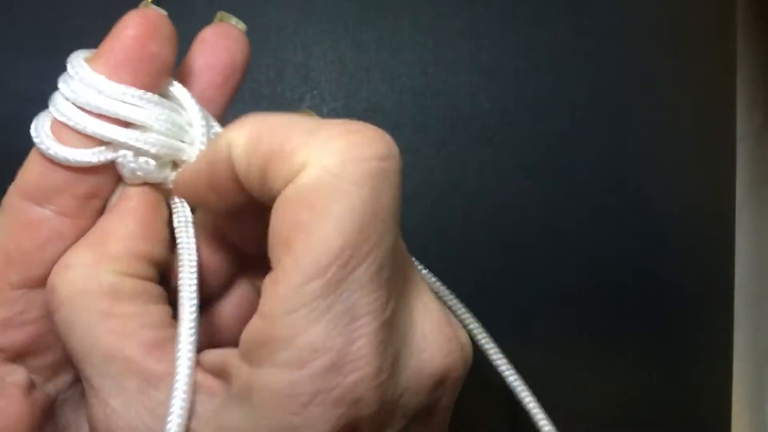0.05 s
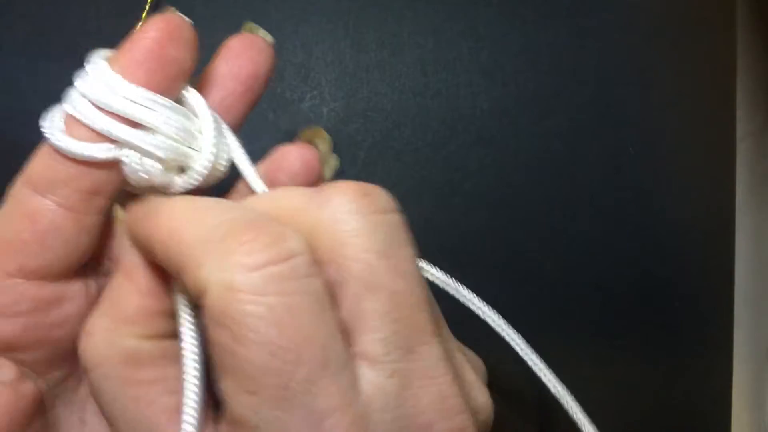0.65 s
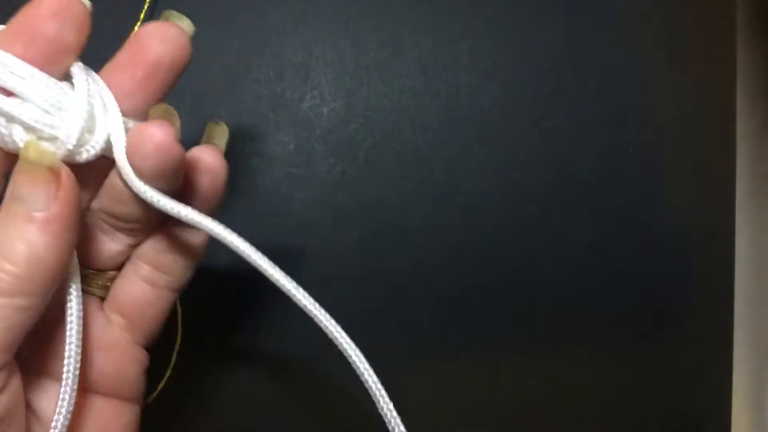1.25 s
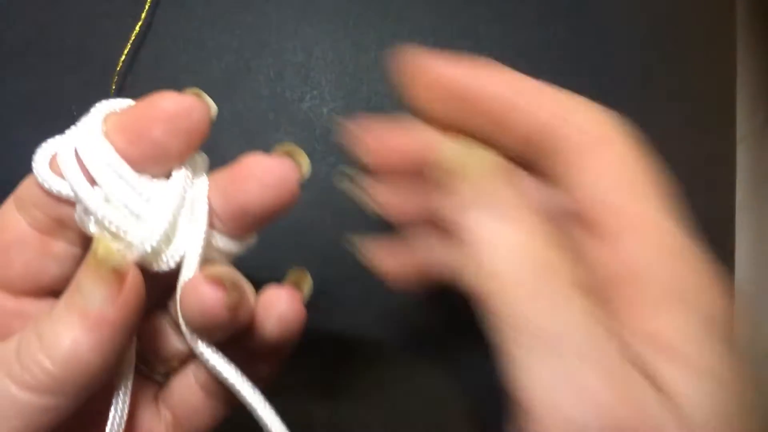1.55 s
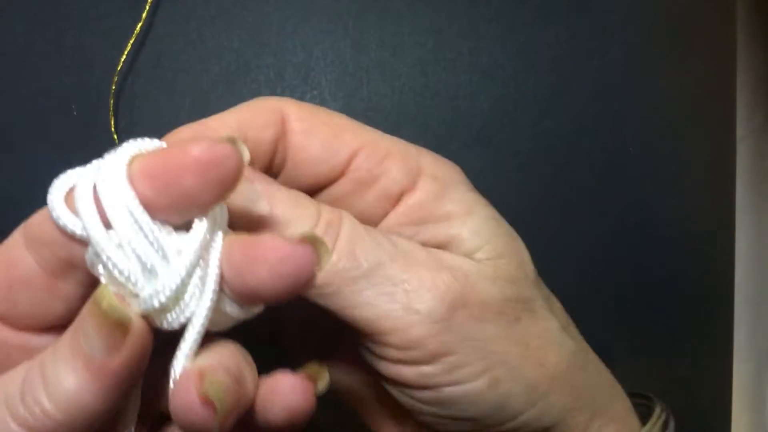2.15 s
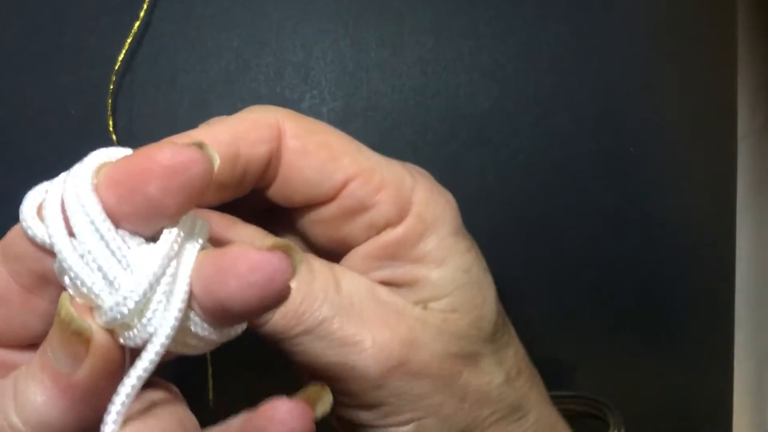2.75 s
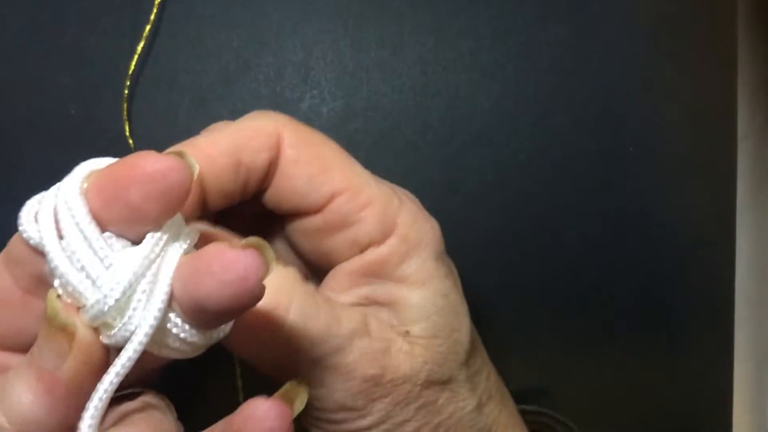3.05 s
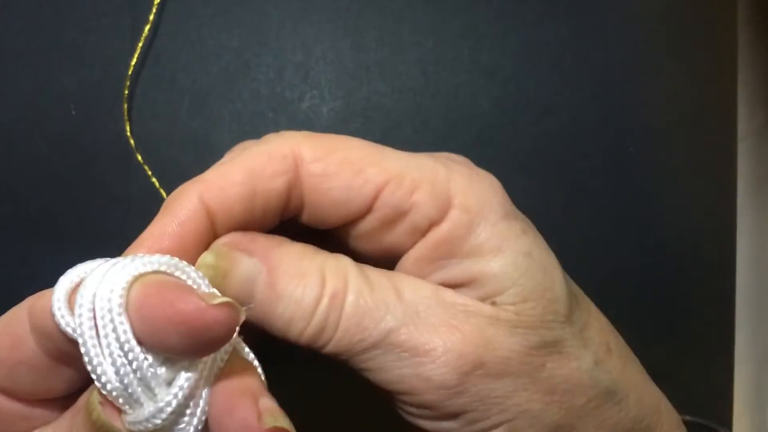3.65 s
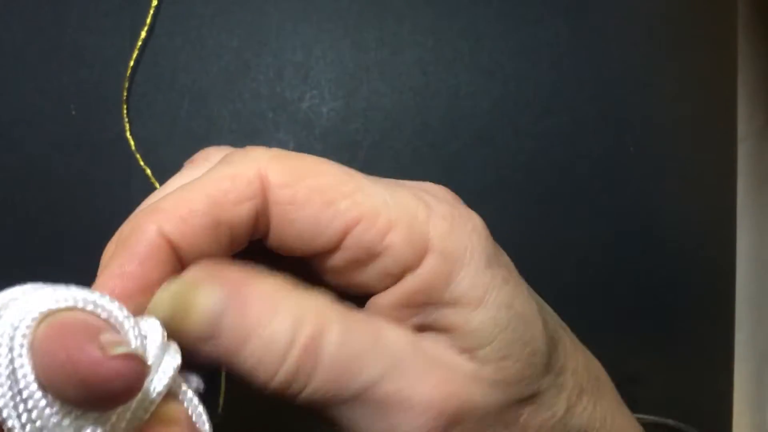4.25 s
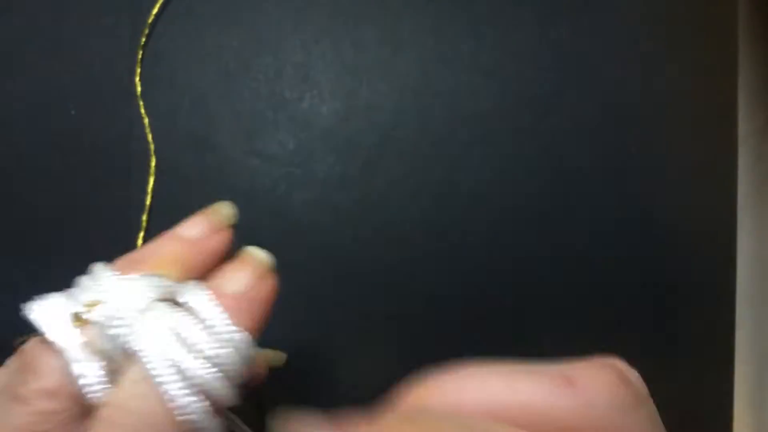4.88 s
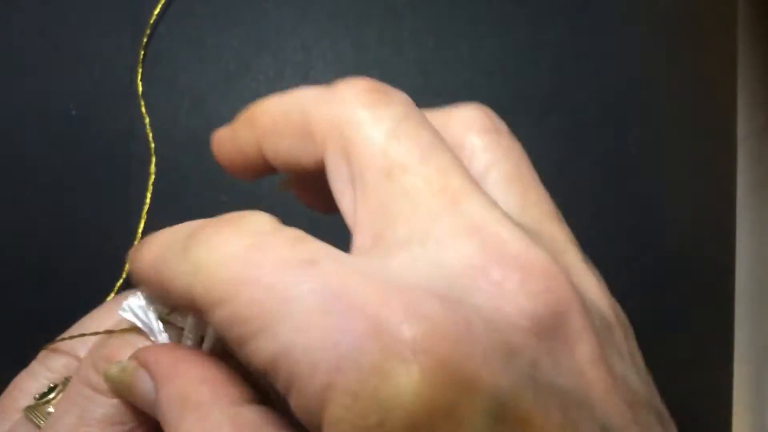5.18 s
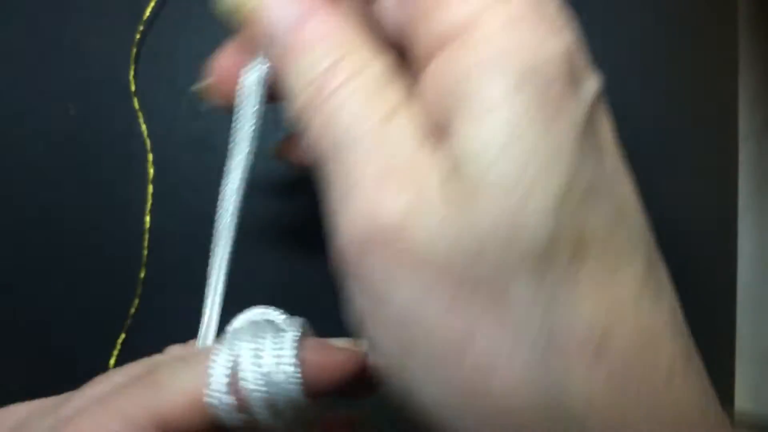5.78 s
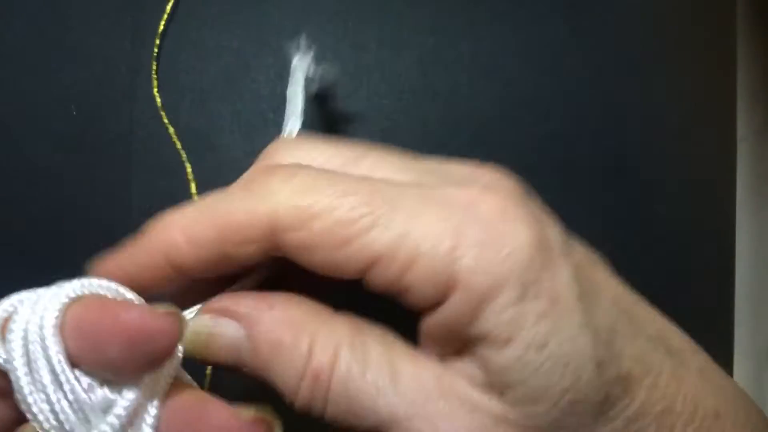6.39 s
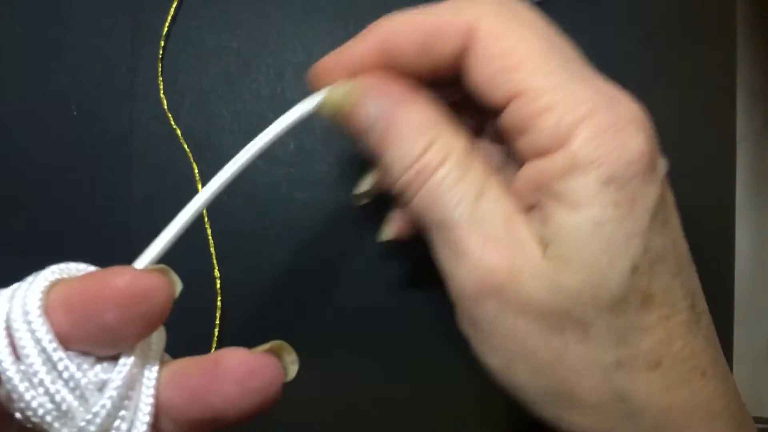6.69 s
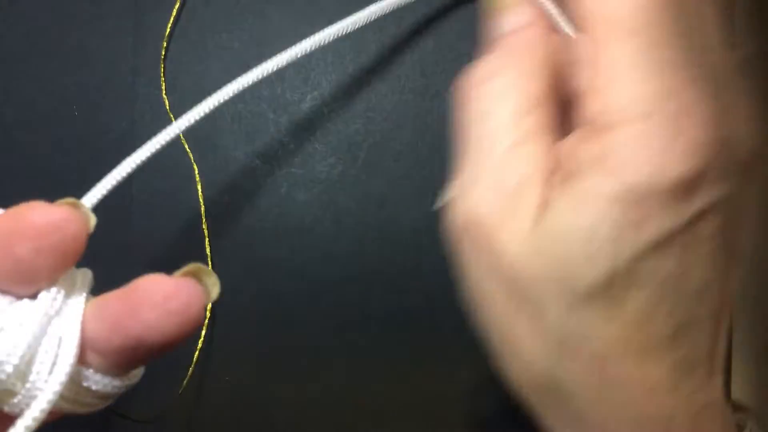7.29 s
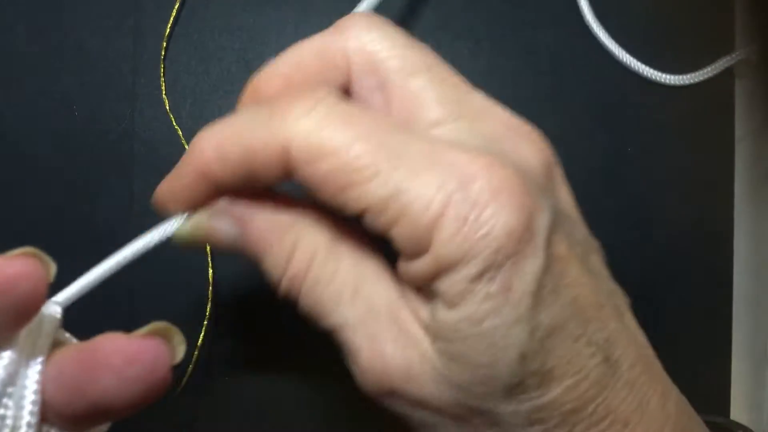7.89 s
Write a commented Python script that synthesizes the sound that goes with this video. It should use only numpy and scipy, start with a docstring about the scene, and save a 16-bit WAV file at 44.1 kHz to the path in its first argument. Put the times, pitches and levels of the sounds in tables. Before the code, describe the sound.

Close up, over the steady hush of a room, a braided cord slides across skin with soft, irregular rubbing. Small sharp fingernail clicks and light jingles of thin bangles come early, with a faint swish of cloth. In the middle the cord tightens and slips amid more clicks and dull bumps of knuckles on a desk. The last pulls are the strongest, rasping and zipping briefly between further low knocks.

```python
"""At a desk in a quiet room, braided cord is pulled and wound round the fingers, heard from close by.
Stick-slip friction makes the braid rasp over cord and skin, creak as it tightens and now and then slip.
Impacts excite damped resonances: fingernails tick, thin bangles jingle, knuckles bump the desk.
Cloth swishes as the arm swings, and the hands rumble along the desk over the steady hush of the room."""
import sys
import numpy as np
from scipy import signal
from scipy.fft import rfft, irfft, next_fast_len
from scipy.io import wavfile
from scipy.ndimage import map_coordinates

SR = 44100
rng = np.random.default_rng(int(sys.argv[2]) if len(sys.argv) > 2 else 0)


def unload_audio(sound):
    """Save the sound as a 16-bit wav file, at the path given as the first command line argument."""
    columns = np.transpose(np.atleast_2d(sound))
    # keep every value between -1 and 1, then stretch to whole-number steps
    steps = np.round(np.clip(columns, -1, 1) * 32767)
    wavfile.write(sys.argv[1], SR, steps.astype(np.int16))


N = 358533
TIME = np.arange(N) / SR


def undb(db):
    """Amplitude ratio of a level in decibels."""
    return 10 ** (np.asarray(db) / 20)


def unit(x):
    """Normalisation to rms 1."""
    return x / np.sqrt(np.mean(x ** 2) + 1e-20)


def add(out, start, x):
    """Superposition: x joins out at a start time in seconds."""
    i = max(int(start * SR), 0)
    out[i:i + len(x)] += x[:max(N - i, 0)]


def colour(x, points):
    """Spectral shaping by points (f/Hz, gain/dB), joined on a logarithmic frequency axis."""
    hz, db = np.transpose(points)
    size = next_fast_len(len(x) + 2048)
    f = np.maximum(np.fft.rfftfreq(size, 1 / SR), 1)
    gain = undb(np.interp(np.log(f), np.log(hz), db))
    return irfft(rfft(x, size) * gain, size)[:len(x)]


def resonate(x, hz, q, stages=1):
    """Resonance: second-order stages in series, each with gain 1 at its centre and at most SR/4 wide."""
    for _ in range(stages):
        x = signal.lfilter(*signal.iirpeak(hz, max(q, 4 * hz / SR), fs=SR), x)
    return x


def fade(t, t60):
    """Exponential damping: 60 dB down after t60 seconds."""
    return np.exp(-np.log(1000) * t / t60)


def ring(modes, scatter_db, detune, size=13000):
    """Modal impulse response: the place of contact weights the modes, the grip shifts them slightly."""
    t = np.arange(size) / SR
    chance = rng.standard_normal((len(modes), 2))
    return sum(undb(db + scatter_db * a) * np.sin(2 * np.pi * hz * (1 + detune * b) * t) * fade(t, t60)
               for (hz, db, t60), (a, b) in zip(modes, chance))


def wander(rate, size):
    """Random modulation: Gaussian values, rate per second, joined by straight lines."""
    steps = rng.standard_normal(4096)
    return np.interp(np.arange(size) / SR * rate, np.arange(len(steps)), steps)


def stroke(start, length, attack, release):
    """Trapezoidal speed of one move of the hand; attack and release are shares of its length."""
    along = (TIME - start) / length
    return np.clip(np.minimum(along / attack, (1 - along) / release), 0, 1)


def friction(size, rate, spread_db, catch_db, hiss):
    """Stick-slip friction: uneven snaps, rate per second, over a hiss, bunched as the strands catch."""
    impulses = (rng.random(size) < rate / SR) * rng.choice([-1, 1], size)
    snaps = impulses * undb(spread_db * np.minimum(rng.exponential(size=size), 4))
    grains = unit(snaps) + hiss * rng.standard_normal(size)
    return unit(grains * undb(catch_db * wander(130, size)))


def hush(level_db=-62):
    """Ambient noise: steady and strongest in the bass."""
    # spectrum of the room's noise: f/Hz, gain/dB
    spectrum = [(22, -56), (38, 2), (55, 7), (100, -4), (250, -2.5), (430, -12), (700, -15), (1200, -16.5),
                (2600, -20.5), (3800, -22), (5000, -25.5), (10000, -24.5), (14500, -27), (16000, -33.5)]
    return undb(level_db) * unit(colour(rng.standard_normal(N), spectrum))


def room(x, size=14000):
    """Reverberation: faint, dull, diffuse reflections follow the direct sound."""
    t = np.arange(size) / SR
    diffuse = colour(rng.standard_normal(size), [(100, 1.5), (3000, -1), (15000, -9)])
    tail = diffuse * fade(t, t60=.11) * (t > .004)
    return x + undb(-17.5) * signal.fftconvolve(x, tail / np.linalg.norm(tail))[:N]


def swishes():
    """Friction noise: cloth brushes in one broad band, its amplitude following the speed of the arm."""
    # swings of the arm: t/s, duration/s, level/dB, centre f/Hz
    swings = [(.8, 0.45, -73, 1590), (1.14, 0.19, -64, 2050), (1.47, 0.36, -68, 2300),
              (6.085, 0.15, -63.5, 3200), (6.258, 0.27, -70.5, 3470), (6.47, 0.18, -74, 5600)]
    out = np.zeros(N)
    for start, length, db, hz in swings:
        cloth = resonate(rng.standard_normal(N), hz, q=1.8, stages=2)
        out += undb(db) * unit(cloth) * stroke(start, length, attack=.27, release=.38)
    return out


def bumps():
    """Impact excitation: knuckles knock the desk, and a softer contact rings only its low modes."""
    # knocks: t/s, peak level/dB, cut-off f/Hz set by the softness of the contact
    knocks = [(1.276, -42, 605), (1.428, -42, 342.7), (1.759, -44.5, 354), (1.966, -42, 252),
              (2.997, -36.5, 265), (3.119, -31.5, 636), (3.145, -38, 405), (3.513, -39.5, 298),
              (4.793, -24.5, 820), (4.986, -36, 252), (5.035, -38, 122), (5.69, -48, 111),
              (7.157, -38.5, 244), (7.221, -30.5, 199), (7.268, -26.5, 201), (7.632, -26.5, 227),
              (8.047, -38, 197)]
    # modes of the desk: f/Hz, relative level/dB, T60/s
    desk_modes = [(59.7, -24, .14), (96.6, -9, 0.48), (117, 0.5, 0.17), (151, -11, 0.11),
                  (191.5, -3, 0.084), (234.6, 0, 0.074), (269, 1.5, 0.091), (311, 3, 0.077),
                  (373, -6, 0.18), (570, 2.5, 0.049), (700, -6, 0.058), (846, 2.5, 0.056),
                  (966, -1.5, 0.068), (1400, 2, 0.023)]
    out = np.zeros(N)
    for start, db, hz in knocks:
        blow = ring(desk_modes, scatter_db=1.2, detune=.01)
        knock = signal.sosfilt(signal.butter(2, [80, hz], "bandpass", fs=SR, output="sos"), blow)
        add(out, start, undb(db) * knock / np.abs(knock).max())
    return out


def bangles(size=13000):
    """Forced vibration: runs of tiny contacts scrape thin metal hoops and drive their modes."""
    # bangles sliding on each other: t/s, duration/s, level/dB, scrape re ring/dB
    jingles = [(0.473, 0.03, -50.5, 2), (1.041, 0.027, -52.5, -6), (1.306, 0.017, -44.5, 4),
               (1.332, 0.018, -55.5, 3), (1.429, 0.018, -50, 0), (1.449, 0.035, -46.5, -5),
               (1.539, 0.013, -59.5, -9), (1.663, 0.0078, -53.5, -1), (1.681, 0.027, -47, -8),
               (1.714, .008, -66, -3), (1.823, 0.0071, -58, 4), (2.067, 0.034, -66, 3),
               (2.684, 0.1, -62, 1), (3.302, .006, -68, 9), (3.4, 0.0236, -54, -1),
               (3.483, 0.048, -55.5, -14), (3.517, 0.028, -56, -20), (3.554, 0.0076, -52.5, 10),
               (3.602, 0.0066, -57.5, 5), (3.629, 0.0085, -58.5, 3), (4.777, 0.039, -50.5, -6),
               (4.865, 0.01, -53.5, 0), (6.919, 0.021, -52, -3)]
    # modes of the hoops: f/Hz, relative level/dB, T60/s
    hoop_modes = [(2410, -16.5, 0.097), (4560, -17.5, 0.076), (5440, -13, 0.1), (7640, -14, 0.11),
                  (8570, 3, 0.088), (9030, -13, 0.094), (9800, -7, .04), (11240, -4, 0.12),
                  (11200, -10, .05), (12650, 1.5, 0.11), (12530, 1, 0.053), (13310, -7, .04),
                  (13900, -9, .04), (14700, -2.5, 0.067), (15500, -6, .04)]
    # spectrum of the scrape: f/Hz, gain/dB
    scrape_spectrum = [(2000, -13.5), (5000, -7), (8500, -1.5), (12500, 6.5), (16000, .5)]
    out, t = np.zeros(N), np.arange(size) / SR
    for start, length, db, scrape_db in jingles:
        touch = np.minimum(t / .0021, 1) * fade(np.maximum(t - length, 0), t60=.0095)
        chatter = touch * friction(size, rate=1800, spread_db=2.5, catch_db=2.5, hiss=.33)
        hoops = ring(hoop_modes, scatter_db=3, detune=.0015)
        metal = signal.fftconvolve(chatter, hoops)[:size]
        scrape = colour(chatter, scrape_spectrum)
        jingle = unit(unit(metal) + undb(scrape_db) * unit(scrape))
        sounding_share = (length + .015) * SR / size
        add(out, start, undb(db) * jingle * np.sqrt(sounding_share))
    return out


def ticks(size=3000):
    """Transient excitation: a nail snaps off an edge and rings briefly, with a duller finger knock."""
    # nail ticks: t/s, peak level/dB, centre f/Hz, relative knock level/dB, nominal Q
    contacts = [(.126, -42.5, 7260, -33, 1.7), (0.2721, -27, 8750, -19, .45), (1.276, -38, 2000, -13, 0.29),
                (3.01, -42, 4300, -4, 1.1), (3.0455, -41.5, 4260, -16, 1.1), (3.069, -41, 4220, -27, 2.3),
                (3.0895, -41.5, 5200, -14.5, .79), (3.1092, -32, 5640, -20.5, 0.91),
                (3.1177, -25.5, 8730, -16, 2.3), (4.6121, -28.5, 3130, -21, .65),
                (4.693, -28.5, 8850, -17.5, .66), (5.4194, -41.5, 8300, -25, 1.3),
                (5.5096, -22, 7150, -35, 1.44), (5.832, -35.5, 7900, -42, 1.9),
                (5.845, -39.5, 7940, -35, 1.7), (5.8527, -42, 9300, -38.5, 1.1),
                (6.0205, -24.5, 8200, -24, 0.99), (6.0444, -42.5, 7020, -12, 1.1),
                (6.4794, -42.5, 5680, -30, 0.79), (7.1561, -34.5, 3570, 8, 1.7),
                (7.6302, -31, 1530, -9, 1.2)]
    # spectrum of the nail's edge: f/Hz, gain/dB
    edge_spectrum = [(400, 11), (1800, 3), (2800, 2.5), (4000, 2), (5000, -5), (6200, 4), (7500, -0.5),
                     (9000, 3.5), (10800, 0), (13000, 7), (16000, 6.5)]
    out, t = np.zeros(N), np.arange(size) / SR
    envelope = np.minimum(t / .002, 1) ** 2 * fade(t, t60=.015)
    for start, db, hz, knock_db, q in contacts:
        snap = colour(rng.standard_normal(size) * envelope, edge_spectrum)
        nail = unit(resonate(snap, hz, q, stages=2))
        finger = unit(resonate(snap, hz=2330, q=.34, stages=2))
        tick = nail + undb(knock_db + 7.5) * finger + undb(-16.5) * unit(snap)
        peak = np.sort(np.abs(tick))[-4:].mean()
        add(out, start, undb(db) * tick / peak)
    return out


def creaks():
    """Slow stick-slip: tight turns of the coil creep over each other in small uneven jerks."""
    # tightenings: start t/s, end t/s, nominal jerk rate/Hz, relative level/dB
    tightenings = [(2.619, 3.004, 76, -71), (3.8, 4.3, 31.6, -72.5), (6.4, 6.731, 35, -71)]
    # spectrum of the coil: f/Hz, gain/dB
    coil_spectrum = [(500, -7), (2500, -2), (5800, -.5), (9000, -2.5), (15000, -19)]
    out, t = np.zeros(N), np.arange(400) / SR
    for start, end, rate, db in tightenings:
        run = np.zeros(N)
        gaps, strengths = rng.standard_normal((64, 2)).T
        times = start + np.cumsum(np.exp(.5 * gaps)) / rate
        jerks = rng.standard_normal((64, len(t))) * fade(t, t60=.0093)
        for onset, strength, jerk in zip(times[times < end], strengths, jerks):
            add(run, onset, undb(2.4 * strength) * jerk)
        sounding_share = (end - start) * SR / N
        out += undb(db) * unit(colour(run, coil_spectrum)) * np.sqrt(sounding_share)
    return out


def slips():
    """Static friction gives way: the cord rasps abruptly and zips as its weave runs over a nail."""
    # slips: t/s, duration/s, relative level/dB, place of the peak (0-1), tilt/(dB per octave),
    # zip re rasp/dB, zip f/Hz
    releases = [(.337, 0.018, -49, 0.5, 1.5, -26, 3900), (0.353, 0.049, -52, 0.3, 4, -28, 3850),
                (0.65, 0.026, -55, 0.5, 5.5, -27, 3850), (0.908, 0.023, -52.5, .5, 6.5, -9, 7000),
                (1.063, 0.02, -47, .7, 12, -5, 7360), (2.713, 0.047, -52.5, 0.35, 6, -6, 5450),
                (3.135, 0.033, -37, 0.35, 4, -10, 660), (3.395, 0.093, -55.5, 0.26, 2.5, -8, 5760),
                (3.477, 0.054, -55.5, 0.67, -1.5, -10, 3760), (4.296, 0.036, -57, .4, 10, -6, 5800),
                (4.53, 0.059, -57, 0.36, 4, -3, 10800), (4.596, 0.028, -49, 0.85, -1.5, 4, 3400),
                (4.641, 0.07, -54.5, 1, 1, -4, 3560), (4.702, 0.16, -49, 0.5, 2, -5, 3340),
                (5.523, 0.081, -55, 0.18, 1, -6.5, 2010), (6.737, 0.18, -53.5, 0.03, 0.5, -6, 3470),
                (6.846, 0.012, -40.5, 0.1, 4, 2, 3740), (6.855, 0.037, -36, 0.18, 4.5, 2, 3920),
                (7.178, 0.076, -45.5, 0.8, -1.5, -14, 3760), (7.236, 0.022, -37, 0.8, -4, -8, 3780),
                (7.238, .04, -33.5, 0.73, -0.5, -7.5, 1210), (7.284, 0.019, -48.5, 0.3, 10, -5, 3500),
                (7.801, 0.096, -46.5, 0.33, 1.5, -7, 3450), (7.858, 0.095, -46.5, 0.8, 0.5, -4, 3620),
                (7.945, 0.064, -49.5, 0.43, 0.5, -4.5, 3820), (7.97, 0.019, -46.5, 0.7, 2, -7, 10700)]
    # spectrum of the slipping cord before the tilt: f/Hz, gain/dB
    spectrum = [(120, -27), (420, -1.5), (650, 9), (1000, 0.5), (1400, 9.5), (2100, 6), (2800, -4),
                (3700, 6), (4500, 3.5), (5900, 1), (9300, 0), (10400, -1.5), (13000, -2), (16000, -20)]
    out = np.zeros(N)
    for start, length, db, peak, tilt_db, zip_db, zip_hz in releases:
        size = int(length * SR)
        grains = friction(size, rate=1500, spread_db=1.5, catch_db=.5, hiss=.89)
        tilted = [(hz, gain_db + tilt_db * np.log2(hz / 4000)) for hz, gain_db in spectrum]
        rasp = unit(colour(grains, tilted))
        weave = unit(resonate(grains, zip_hz, q=2.5, stages=2))
        swell = np.sqrt(np.interp(np.linspace(0, 1, size), [0, np.clip(peak, .05, .95), 1], [0, 1, 0]))
        add(out, start, undb(db) * swell * unit(rasp + undb(zip_db) * weave))
    return out


def sliding(hold_db=-76, rest_db=-70.5):
    """Sliding friction: loose pulls sound mostly fibres, tight ones skin; a dragged hand rumbles."""
    # pulls through the fingers: t/s, duration/s, relative level/dB, grip (0 loose, 1 tight)
    pulls = [(0.022, 0.19, -65.5, 0.45), (0.223, 0.11, -70, 0.2), (.37, 0.066, -71, 0.1),
             (0.462, .06, -69, 0.2), (.54, 0.18, -76.5, 0.05), (0.84, 0.6, -68, 0.67),
             (1.006, 0.16, -68.5, 0), (1.58, 0.27, -70, 0.2), (1.949, 0.082, -62.5, 0.63),
             (2.002, 0.1, -72, 0), (2.308, 0.073, -68.5, 0.13), (2.505, 0.44, -64, 0.86),
             (2.909, 0.32, -61.5, 0.78), (3.28, 0.32, -64, .65), (3.383, 0.071, -58, 0.6),
             (3.732, 0.018, -65, 0.47), (3.938, 0.055, -72.5, 0), (4.306, 0.032, -72, .1),
             (4.492, 0.041, -66, 0.54), (4.829, 0.31, -64, 1), (5.127, 0.23, -64, 0.94),
             (5.357, 0.042, -65, 0.7), (5.43, 0.088, -71, 1), (5.58, 0.23, -69.5, 0.37),
             (5.78, 0.33, -66.5, 0.15), (6.376, 0.4, -72, 0.46), (6.468, 0.032, -67, 0.3),
             (6.615, 0.053, -72.5, 0), (6.738, 0.26, -62.5, .5), (6.958, .11, -57, 0.52),
             (7.367, 0.069, -67.5, 0.89), (7.572, .12, -64, 0.72), (8.013, .15, -64, 0.6)]
    # drags of a hand along the desk: t/s, duration/s, relative level/dB
    drags = [(1.955, 0.094, -59.5), (2.503, 0.42, -51.5), (2.971, 0.23, -49.5), (3.314, 0.31, -55.5),
             (3.844, .05, -57), (4.855, 0.3, -47.5), (5.135, 0.3, -49.5), (5.62, 0.13, -57.5),
             (6.736, .15, -50), (6.937, 0.18, -55.5), (7.16, 0.16, -43), (7.624, 0.13, -59),
             (7.806, 0.24, -49.5)]
    # friction spectra of braid, fine fibres, skin and desk: f/Hz, gain/dB
    braid_spectrum = [(1200, -44), (2400, -1), (2850, -6), (3150, 5), (3900, 4), (4300, 6), (4900, 0.5),
                      (6000, 3.5), (6450, 1), (7300, -2), (9500, -19), (14000, -46)]
    fibre_spectrum = [(4500, -32), (7000, -3.5), (8500, 0.5), (9800, 0.5), (10400, -3.5), (12000, 1),
                      (15000, -8.5), (16500, -22.5)]
    skin_spectrum = [(250, -2), (460, -3), (660, 4.5), (1000, 1.5), (1300, -3), (2000, 0.5), (2800, -10.5),
                     (4500, -30.5)]
    desk_spectrum = [(25, -26), (50, -2.5), (80, -9.5), (112, 7), (145, -8.5), (260, -1), (330, -6),
                     (460, -18), (1000, -42.5)]
    rasp = sheen = skin = undb(hold_db)  # the held cord stirs even between moves
    for start, length, db, grip in pulls:
        pull = undb(db) * stroke(start, length, attack=.18, release=.28)
        rasp = rasp + pull
        sheen = sheen + pull * undb(np.interp(grip, [0, 1], [8.5, -8]))
        skin = skin + pull * undb(np.interp(grip, [0, 1], [-16.5, 6]))
    weight = undb(rest_db)  # the wrists rest on the desk
    for start, length, db in drags:
        weight = weight + undb(db) * stroke(start, length, attack=.11, release=.27)
    strands = friction(N, rate=2500, spread_db=2, catch_db=2, hiss=.8)
    fibres = friction(N, rate=3500, spread_db=1.5, catch_db=2.2, hiss=.8) + .6 * strands
    palm = friction(N, rate=1500, spread_db=3, catch_db=4.5, hiss=1)
    drag = friction(N, rate=400, spread_db=3, catch_db=1.5, hiss=1)
    cord = rasp * unit(colour(strands, braid_spectrum)) + sheen * unit(colour(fibres, fibre_spectrum))
    hands = skin * unit(colour(palm, skin_spectrum)) + weight * unit(colour(drag, desk_spectrum))
    uneven_db = 1.4 * wander(35, N)  # the hand's speed is never quite even
    return (cord + hands) * undb(uneven_db - 2)


def rubbing():
    """Comb filtering: narrow resonances colour the friction, which interferes with its echo off the desk."""
    # resonances that colour the rubbing: f/Hz, Q, gain/dB
    resonances = [(613, 20, 1), (2450, 22, -6), (3320, 18, -11), (3830, 52, -6), (5730, 11, -7),
                  (7360, 66, -13), (9500, 21.8, -5)]
    # delay of the desk's echo as the hands rise and sink: t/s, lag/ms
    echo_path = [(0, 1.7), (2.5, 1.24), (3.5, 1.32), (4.7, 1), (5.2, 1.4), (6.8, 1.79), (7.3, 2.06),
                 (8.13, 1.46)]
    source = sliding() + slips() + creaks()
    ringing = sum(undb(db) * resonate(source, hz, q) for hz, q, db in resonances)
    direct = undb(-2) * (source + ringing)
    lag_s = np.interp(TIME, *np.transpose(echo_path)) / 1000
    echo = map_coordinates(direct, [(TIME - lag_s) * SR], order=3)
    return direct + .35 * echo


def scene():
    """Superposition of the handling, its reverberation and the hush, in one channel."""
    handling = rubbing() + swishes() + ticks() + bangles() + bumps()
    return (room(handling) + hush())[None]


def record(dry):
    """Band limiting: a steep low-pass cuts the highest treble."""
    top_hz = 16200
    return signal.sosfilt(signal.ellip(10, .2, 70, top_hz, fs=SR, output="sos"), dry)


dry = scene()
out = record(dry)
unload_audio(out)
```